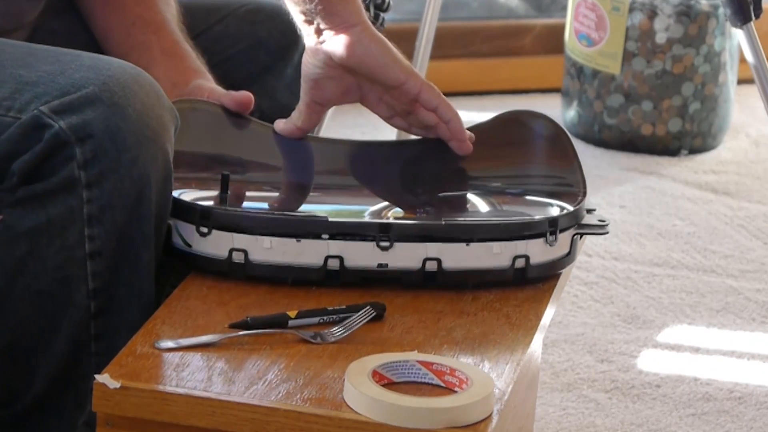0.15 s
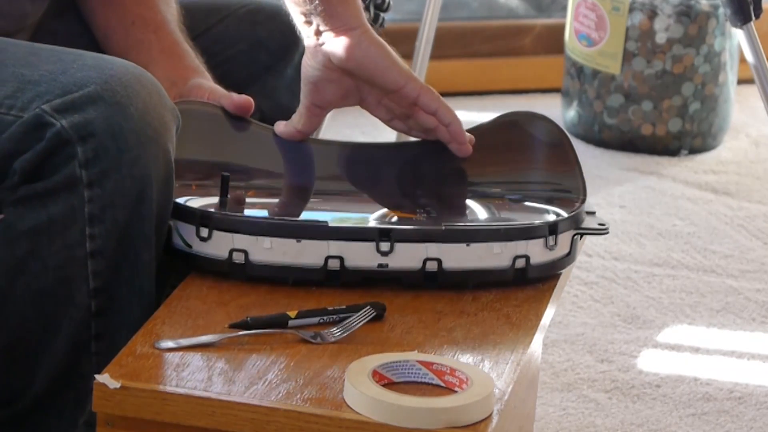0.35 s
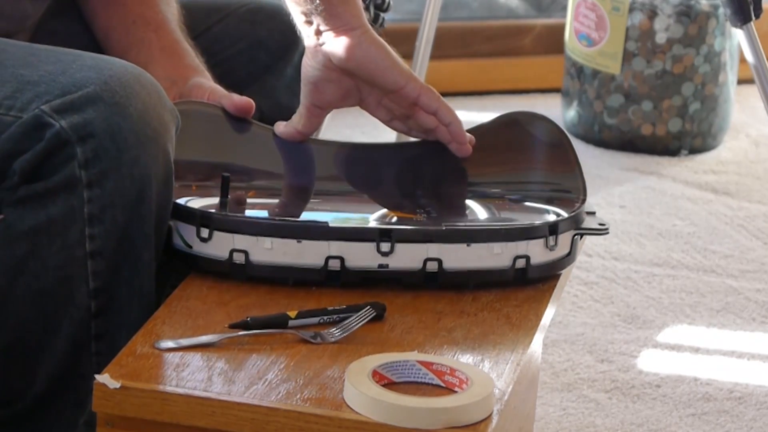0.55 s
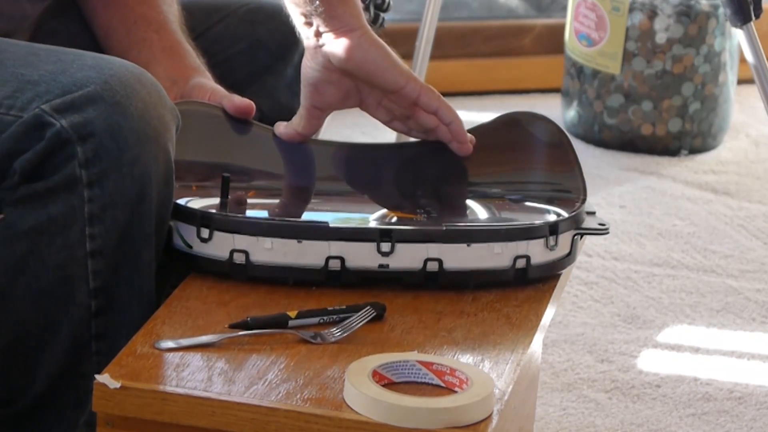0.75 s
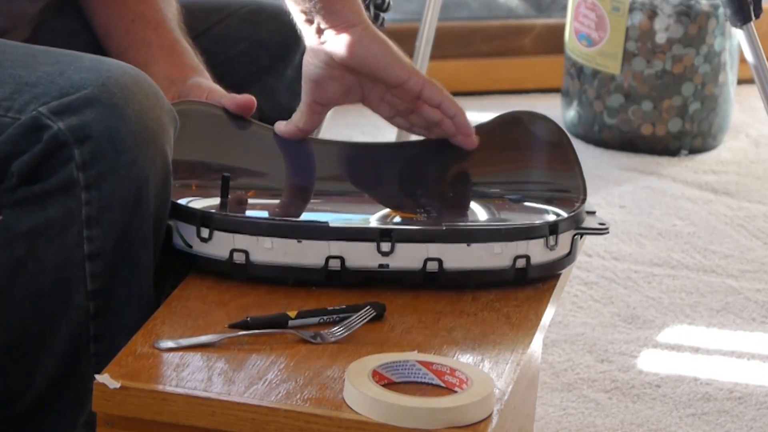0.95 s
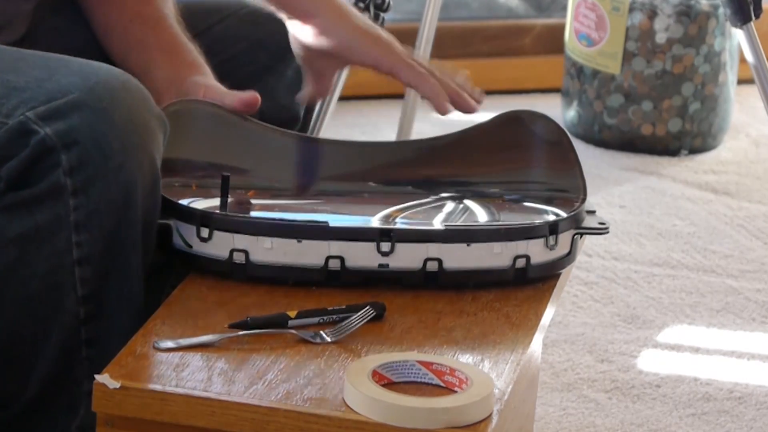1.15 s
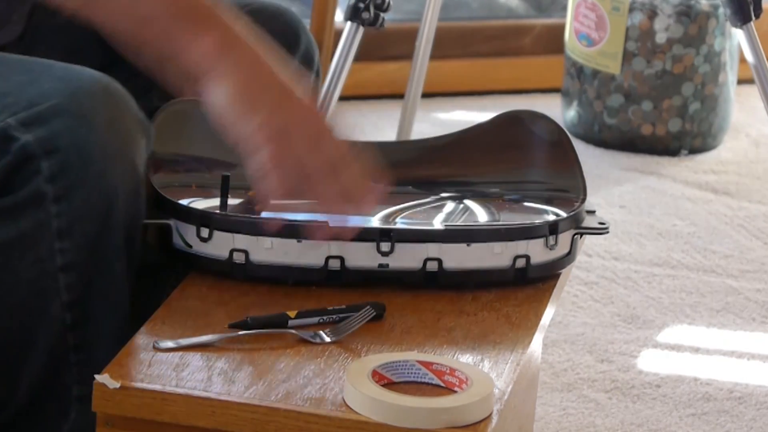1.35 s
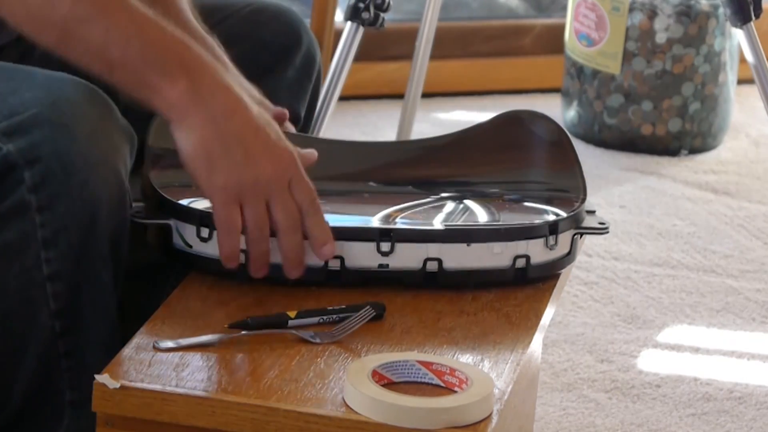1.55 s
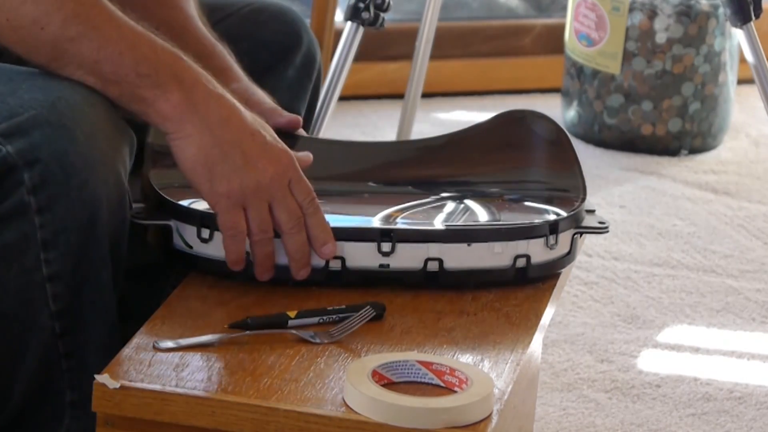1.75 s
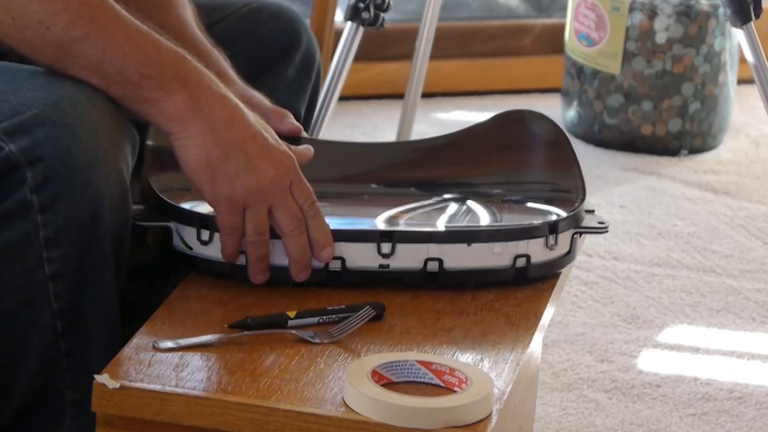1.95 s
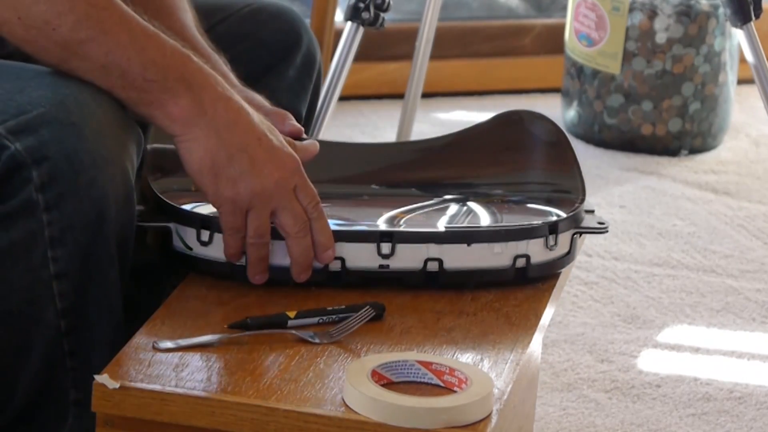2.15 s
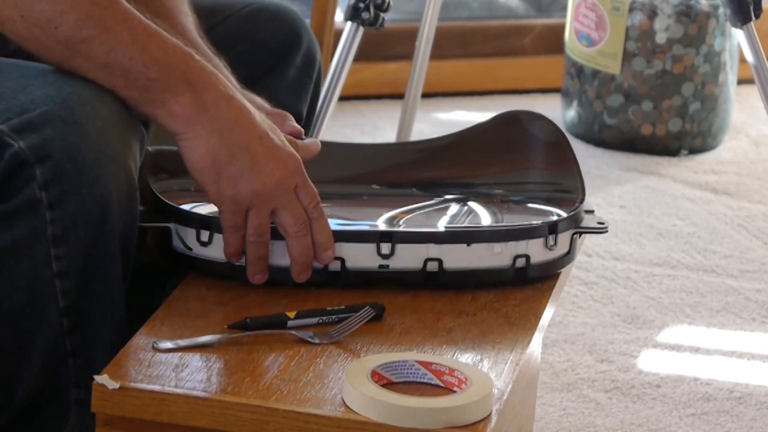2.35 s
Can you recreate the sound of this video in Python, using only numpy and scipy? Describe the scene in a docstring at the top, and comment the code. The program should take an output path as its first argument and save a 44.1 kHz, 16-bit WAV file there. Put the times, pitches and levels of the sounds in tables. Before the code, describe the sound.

Pressed by hand, a plastic catch snaps home with a loud crack. The housing knocks on a wooden table and clicks twice more, less loudly, while fingers rub faintly. It is heard in stereo in a quiet, carpeted room.

```python
"""A catch snaps home loudly as a clear plastic cover is pressed onto a housing on a wooden table.
Each click, large or small, is a crack of noise that sets the plastic ringing. The housing knocks
dully on the table, and hands rub and creak on it in tiny slips of skin. The place is a carpeted
room, heard in stereo: it rings briefly around the handling, and behind it lie an appliance's hum,
a thin swelling tone and the hiss of room and microphone."""
import sys
import numpy as np
from scipy import signal
from scipy.fft import rfft, irfft
from scipy.io import wavfile

SR = 44100
rng = np.random.default_rng(int(sys.argv[2]) if len(sys.argv) > 2 else 0)


def file_out(sig):
    """Save sig as 16-bit WAV at sys.argv[1]."""
    # one column per channel
    cols = np.atleast_2d(sig).T
    # limit, then scale
    lim = np.clip(cols, -1, 1)
    pcm = np.round(lim * 32767).astype(np.int16)
    wavfile.write(sys.argv[1], SR, pcm)


N = 105840

BAND_EDGES_HZ = 22 * 2 ** np.arange(0, 9.9, .5)

# Room tone and microphone hiss. Each row: frequency in Hz, relative density in dB.
FLOOR_SPECTRUM = [(15, -46), (25, -9), (113, -9), (165, -7.5), (228, -1.5), (291, -5.5), (437, -6),
                  (486, -11), (981, -15.5), (13100, -26), (15800, -43)]
# Stereo image of that noise. Each row: frequency in Hz, left-right correlation.
FLOOR_CORRELATION = [(60, 0.64), (130, 0.56), (290, 1), (640, 0.48), (1410, 0.12), (3100, -0.93),
                     (6820, -0.53), (15000, -0.36)]
# An appliance in the background. Each row: frequency in Hz, central rms level in dB, waver in dB.
HUM_LINES = [(119, -63.5, 10.5), (241, -59.5, -3)]
# The swell of the thin tone. Each row: time in seconds, rms level in dB.
TONE_SWELL = [(0, -59.5), (.9, -61.5), (1.2, -61), (1.55, -66), (1.75, -54), (2.1, -53.5), (2.2, -49),
              (2.4, -51.5)]

# The room's decay. Each row: frequency in Hz, seconds to fall 60 dB.
ROOM_DECAY = [(100, 0.27), (250, 0.7), (600, 0.43), (1500, 0.44), (4000, 0.42), (7000, 0.41), (11000, 0.29),
              (15000, 0.25)]
# The room's tail at the microphone. Each row: frequency in Hz, gain in dB.
ROOM_SPECTRUM = [(50, -16.5), (110, -16), (170, -20), (250, -9.5), (500, -5.5), (1000, 2), (3000, 0),
                 (8000, 0), (15000, -3.5)]
# Stereo image of the tail. Each row: frequency in Hz, left-right correlation.
ROOM_CORRELATION = [(60, 0.82), (130, 0.99), (290, 0.99), (640, 1), (1410, 0.91), (3100, 0.37), (6820, 0.2),
                    (15000, -0.6)]
# Balance of the tail. Each row: frequency in Hz, left over right in dB.
ROOM_BALANCE = [(300, -0.5), (1000, -0.4), (2000, 0), (4000, 0.5), (8000, 0.7), (13000, -0.3)]

# Modes of cover and housing. Each row: frequency in Hz, gain in dB, seconds to fall 60 dB.
PLASTIC_MODES = [(256, -0.5, 0.077), (386, -3, .1), (462.8, -5.5, 0.2), (529.4, -2.5, 0.045),
                 (593, -0.5, 0.081), (625.3, -1.5, 0.073), (769.6, -6, 0.046), (951, -4.5, 0.034),
                 (4300, -22.5, .015), (5100, -24, 0.0075), (8300, -26, .008)]
# Hands on the plastic, one list a stroke. Each row: time in seconds, body, middle and treble in dB.
RUB_STROKES = [
    [(0.0, -23, -57.5, -54.5), (0.016, -61, -58, -59.5), (0.022, -50, -61, -54.5), (0.048, -40, -59, -55.5),
     (0.062, -65, -60, -51), (0.128, -56, -62, -64), (0.156, -72, -52, -54), (0.182, -56.5, -58, -59),
     (0.19, -33, -57, -55.5)],
    [(0.52, -79, -65.5, -63), (0.574, -49.5, -64.5, -67.5), (0.706, -70, -81.5, -72),
     (0.724, -44, -61.5, -66), (0.732, -49.5, -78.5, -69), (0.854, -85, -68.5, -70), (0.88, -52, -79, -67),
     (0.922, -78.5, -77.5, -75.5), (0.93, -54, -66, -76)],
    [(1.02, -25, -46, -57), (1.032, -54, -65, -54), (1.046, -52, -38, -52), (1.062, -70, -41, -43),
     (1.072, -58, -40.5, -54), (1.182, -53, -82, -69), (1.302, -67, -59.5, -63.5), (1.4, -57, -82, -70),
     (1.5, -69.5, -82, -65)],
    [(1.5, -71.5, -70, -61), (1.528, -75, -74, -71.5), (1.62, -51.5, -57.5, -56.5),
     (1.794, -69, -68.5, -69.5), (1.828, -52, -57.5, -59), (1.878, -67, -69.5, -71), (1.916, -55, -62, -64),
     (1.96, -60, -80, -75), (1.975, -30, -40, -38)],
    [(2.09, -67, -84, -67), (2.138, -52, -54, -73), (2.15, -41, -55, -66), (2.196, -49.5, -53.5, -70),
     (2.256, -50.5, -54.5, -64.5), (2.3, -49, -65, -84), (2.316, -67, -62, -69), (2.334, -46, -51.5, -72),
     (2.4, -72, -92.5, -78.5)],
]
# Middle and treble hiss of the rubbing. Each row: frequency in Hz, relative density in dB.
RUB_MIDDLE_SPECTRUM = [(600, -77), (1200, 20), (1900, -16.5), (2500, 31), (3200, 31), (4500, -50),
                       (9000, -52)]
RUB_TREBLE_SPECTRUM = [(2500, -40), (4500, 18.5), (7000, 11.5), (9000, 4.5), (15000, 10.5)]
# The housing against the table. Each row: start in seconds, envelope peak in dB, pitch in Hz.
TABLE_KNOCKS = [(0.211, -13.5, 464), (.564, -36.5, 510), (.578, -38, 517), (0.72, -40.5, 476),
                (.734, -39.5, 470), (.868, -45, 455), (.933, -34.5, 433), (.950, -44, 460),
                (.967, -20.5, 375), (.986, -29.5, 380), (0.997, -26, 377), (1.010, -31, 390),
                (1.034, -35, 390), (2.009, -22, 300), (2.149, -37, 475), (2.162, -29, 496),
                (2.177, -38, 496), (2.221, -37.5, 406.5), (2.249, -34, 440)]
# Colour common to all cracks. Each row: frequency in Hz, gain in dB.
CRACK_SPECTRUM = [(60, -35), (130, -12), (200, -77), (350, -20), (600, -14), (1500, -5), (3000, -4.5),
                  (6500, 0), (11000, 3.5), (15000, 25)]
# The six frequencies in Hz at which each click has its own colour.
CLICK_COLOUR_HZ = [500, 1500, 3000, 5000, 9000, 14000]
# Catches and edges. Each row: start in seconds, level in dB, six colour offsets in dB,
# seconds for the crack to fall 60 dB (raised to 0.028 if shorter).
CATCH_CLICKS = [(0.0205, -43.5, -7.5, -15, -12, -4.5, -29, -34, 0.041),
                (0.0605, -31, -7, -23, -19, -11, -28, -39, 0.031),
                (0.1498, -31, -14, -11, -19, -9, -27, -41, 0.058),
                (0.1574, -39, -20, -20, -15, -9, -16, -30, 0.066),
                (0.2174, -2, -6.5, -15, -11.5, -30, -11.5, -37, 0.047),
                (0.2253, -7.5, -15, -24.5, -11, -0.5, -11.5, -21.5, 0.048),
                (0.9439, -41.5, -5, -14, -10.5, -15.5, -10.5, -43.5, 0.079),
                (0.9502, -39, -3, -9.5, -20, -19, -13, -42.5, 0.062),
                (0.9715, -32.5, -8, -4, -15.5, -19, -27, -41, 0.042),
                (1.0424, -22.5, -14, -13, -9.5, -12.5, -21.5, -44, 0.051),
                (1.0499, -36, -27, -32, -5, 5, -20, -34, 0.04),
                (1.0672, -30, -5.5, -25, -40, 2.5, -16.5, -37, 0.033),
                (1.0779, -30, -12, -4, -24, -38, -19, -40, 0.05),
                (1.9839, -14.5, -14, -17.5, -7, -8.5, -27, -37, 0.053),
                (1.9914, -21.5, -16, -34, -12.5, -18, -14.5, -40.5, 0.038),
                (2.3266, -46.5, -20, 2, -8, -24, -26.5, -31, 0.052),
                (.2215, -10.5, -15, -3.5, -16, -8.5, -23.5, -26.5, 0.015),
                (.231, -8, -10, -4, -6, -11, -21, -38.5, .04),
                (1.972, -40, 5, 6.5, -19, -1, -16, -35, 0.15),
                (1.979, -29, -6, -11.5, -2, -4, -36, -37, 0.034),
                (2.196, -38.5, -4.5, 1.5, -20, -23, -38, -45, 0.22)]


def amp(db):
    """Decibels as amplitude."""
    return 10 ** (np.asarray(db) / 20)


def unit_rms(x):
    """The signal scaled to an rms of 1."""
    return x / np.sqrt(np.mean(x ** 2) + 1e-20)


def at_hz(points, hz):
    """A curve's value at a frequency, along a log axis."""
    frequencies, values = np.transpose(points)
    return np.interp(np.log(hz), np.log(frequencies), values)


def bands():
    """Half-octave filters with their centres in Hz."""
    return [(signal.butter(2, [lo, hi], "band", fs=SR, output="sos"), np.sqrt(lo * hi))
            for lo, hi in zip(BAND_EDGES_HZ, BAND_EDGES_HZ[1:])]


def drift(rate_hz):
    """A slow random wander with an rms of 1."""
    pole = np.exp(-80 * np.pi * rate_hz / SR)
    white = rng.standard_normal(N // 40 + 2002)
    slow = signal.lfilter([1], [1, -2 * pole, pole * pole], white)[2000:]
    return np.interp(np.arange(N) / 40, np.arange(len(slow)), unit_rms(slow))


def stereo(mid, side, correlation):
    """Left and right from a mid and a side noise."""
    alike = np.clip(correlation, -.99, .995)
    return (np.sqrt(1 + alike) * mid + np.sqrt(1 - alike) * side * np.array([[1], [-1]])) / np.sqrt(2)


def colour(x, spectrum):
    """Shape by a spectrum to an rms of 1; neighbouring bands alternate in sign so that they join."""
    return unit_rms(sum((-1) ** k * amp(at_hz(spectrum, hz)) * signal.sosfilt(sos, x)
                        for k, (sos, hz) in enumerate(bands())))


def ring(impulses, hz, t60):
    """One mode: a unit impulse starts a dying sine of height 1."""
    r, w = amp(-60 / (t60 * SR)), 2 * np.pi * hz / SR
    return signal.lfilter([0, np.sin(w)], [1, -2 * r * np.cos(w), r * r], impulses + 1e-18)


def noise_floor(level_db=-51.5, flicker_db=-0.6):
    """Rumble and hiss of room and microphone, flickering a little in each band."""
    white, out = rng.standard_normal((2, 2, N)), np.zeros((2, N))
    for k, (sos, hz) in enumerate(bands()):
        mid, side = signal.sosfilt(sos, white[k % 2])
        gain = amp(at_hz(FLOOR_SPECTRUM, hz) + flicker_db * drift(3.1))
        out += gain * stereo(mid, side, at_hz(FLOOR_CORRELATION, hz))
    return amp(level_db) * unit_rms(out)


def appliance_hum():
    """An appliance hums in the centre of the image, wavering in level and phase."""
    t, out = np.arange(N) / SR, np.zeros(N)
    for hz, db, waver_db in HUM_LINES:
        height = np.sqrt(2) * amp(db + waver_db * np.tanh(drift(1.5)))
        out += height * np.sin(2 * np.pi * hz * t + 1.9 * drift(3.5))
    return out


def thin_tone(hz=434):
    """A faint, slightly unsteady tone that swells towards the end."""
    t = np.arange(N) / SR
    height = np.sqrt(2) * amp(np.interp(t, *np.transpose(TONE_SWELL)))
    return height * np.sin(2 * np.pi * hz * t + 0.48 * drift(4.2))


def carpeted_room(source, tail_db=0.5, gap_s=0.001, bass_cut_hz=256):
    """From table to microphone: direct sound, thin in the bass, and a tail that dies band by band."""
    t = np.arange(int(.7 * SR)) / SR
    white, response = rng.standard_normal((2, 2, len(t))), np.zeros((2, len(t)))
    for k, (sos, hz) in enumerate(bands()):
        fade = amp(-60 * t / at_hz(ROOM_DECAY, hz)) * np.clip(t / gap_s - 1, 0, 1)
        fade *= amp(tail_db + at_hz(ROOM_SPECTRUM, hz)) / np.sqrt(np.sum(fade ** 2))
        tail = stereo(*white[k % 2], at_hz(ROOM_CORRELATION, hz)) * fade
        balance = amp(at_hz(ROOM_BALANCE, hz) / 2 * np.array([[1], [-1]]))
        response += balance * signal.sosfilt(sos, tail)
    direct = signal.sosfilt(signal.butter(4, bass_cut_hz, "high", fs=SR, output="sos"), source)
    return direct + signal.fftconvolve(source[None], response, axes=1)[:, :N]


def hand_rubbing(slips_per_s=5000, spread_db=1):
    """Dense uneven slips of skin on plastic stir the low modes and hiss in the middle and treble."""
    t, out = np.arange(N) / SR, np.zeros(N)
    sizes = amp(spread_db * np.minimum(rng.exponential(1, N), 4)) * rng.choice([-1, 1], N)
    slips = sizes * (rng.random(N) < slips_per_s / SR) + 1e-18
    body = unit_rms(sum(amp(db) * ring(slips, hz, t60) for hz, db, t60 in PLASTIC_MODES[:8]))
    layers = body, colour(slips, RUB_MIDDLE_SPECTRUM), colour(slips, RUB_TREBLE_SPECTRUM)
    for stroke in RUB_STROKES:
        times, *levels_db = np.transpose(stroke)
        touch = np.clip(np.minimum(t - times[0], times[-1] - t) / .008, 0, 1)
        out += touch * sum(amp(np.interp(t, times, db)) * layer for db, layer in zip(levels_db, layers))
    return out


def table_knocks(rise_cycles=0.61, fall_cycles=1.32):
    """The housing meets the wood softly: a few cycles that swell and die."""
    t, out = np.arange(SR // 20) / SR, np.zeros(N)
    for start_s, db, hz in TABLE_KNOCKS:
        start = int(start_s * SR)
        shape = (1 - np.exp(-t * hz / rise_cycles)) ** 2 * np.exp(-t * hz / fall_cycles)
        out[start:start + len(t)] += amp(db) * shape / shape.max() * np.sin(2 * np.pi * hz * t)
    return out


def crack_bursts(t60s, leading_edge=0.24):
    """Dying noise with a smoothed spectrum, as from many small parts letting go together."""
    t = np.arange(SR // 16) / SR
    fade = amp(-60 * t / np.maximum(t60s, .028))
    cracks = rng.standard_normal(fade.shape) * fade
    for _ in range(3):  # flatten the spectrum, restore the decay, soften the peaks
        spectrum = rfft(cracks, axis=1)
        cracks = irfft(spectrum / np.abs(spectrum), len(t), axis=1) * fade
        cracks /= np.abs(cracks).max(axis=1, keepdims=True)
        cracks = np.sign(cracks) * np.sqrt(np.abs(cracks) * fade)
    cracks[:, 0] = leading_edge
    return cracks


def click_strengths(hz):
    """How strongly each click drives this frequency, as an amplitude."""
    return amp([row[1] + np.interp(np.log(hz), np.log(CLICK_COLOUR_HZ), row[2:8])
                for row in CATCH_CLICKS])


def catch_clicks(modes_db=-2, scatter_db=2, crack_db=4):
    """Catches and edges snap: each gives a short crack and rings the plastic in its own colour."""
    rows, out = np.array(CATCH_CLICKS), np.zeros(N)
    starts = (rows[:, 0] * SR).astype(int)
    scatter = scatter_db * rng.standard_normal((len(rows), len(PLASTIC_MODES)))
    for k, (hz, db, t60) in enumerate(PLASTIC_MODES):
        impulses = np.zeros(N)
        impulses[starts] = click_strengths(hz) * amp(modes_db + db + scatter[:, k])
        out += ring(impulses, hz, t60)
    cracks = crack_bursts(t60s=rows[:, 8:])
    for k, (sos, hz) in enumerate(bands()[2:]):
        band = signal.sosfilt(sos, cracks)
        peaks = amp(crack_db + at_hz(CRACK_SPECTRUM, hz)) * click_strengths(hz)
        band *= ((-1) ** k * peaks / np.abs(band).max(axis=1))[:, None]
        for start, crack in zip(starts, band):
            out[start:start + len(crack)] += crack
    return out


def scene():
    """At the microphone: the handling on the table, through the room, over the background."""
    handling = catch_clicks() + table_knocks() + hand_rubbing()
    return carpeted_room(handling) + noise_floor() + appliance_hum() + thin_tone()


def record(dry):
    """Peaks beyond full scale overload the input, and the top of the treble is cut."""
    treble_cut = signal.cheby2(16, 80, 16400, fs=SR, output="sos")
    return signal.sosfilt(treble_cut, np.clip(dry, -1, 1))


dry = scene()
out = record(dry)
file_out(out)
```